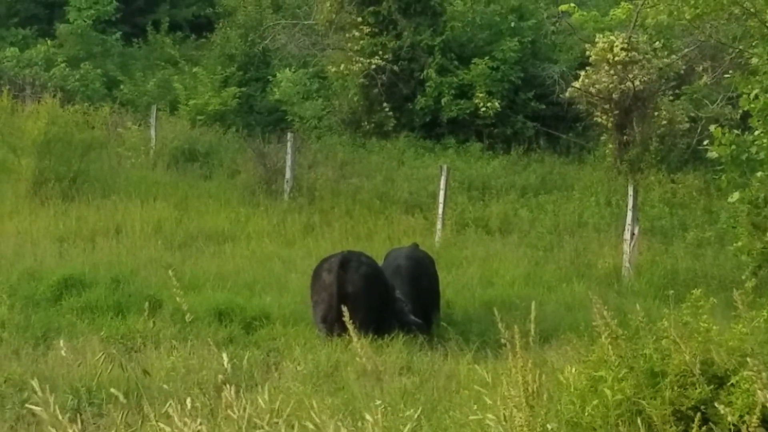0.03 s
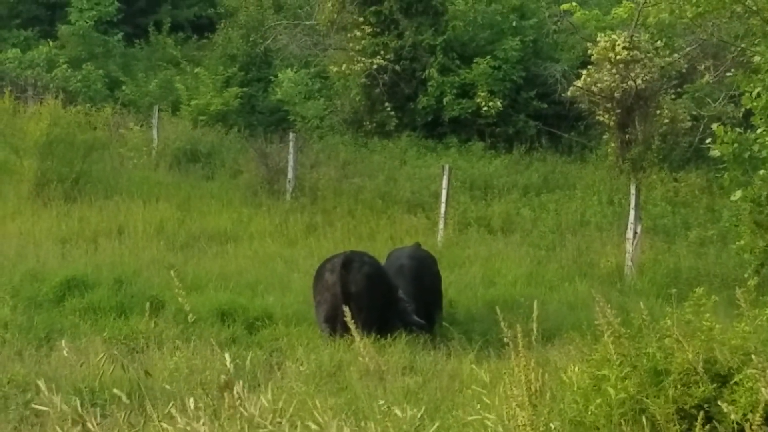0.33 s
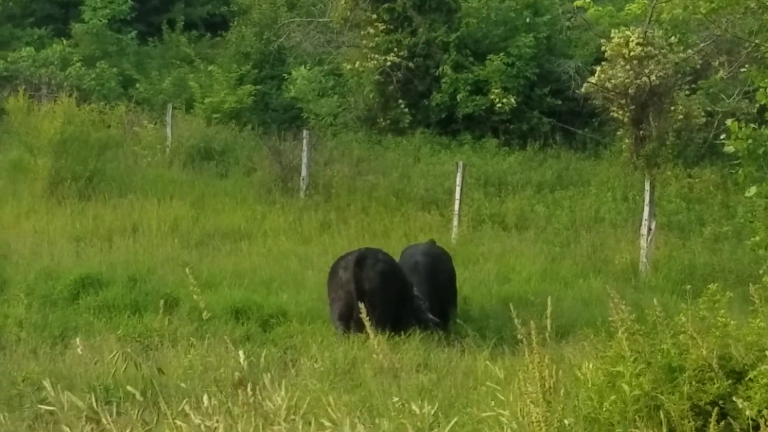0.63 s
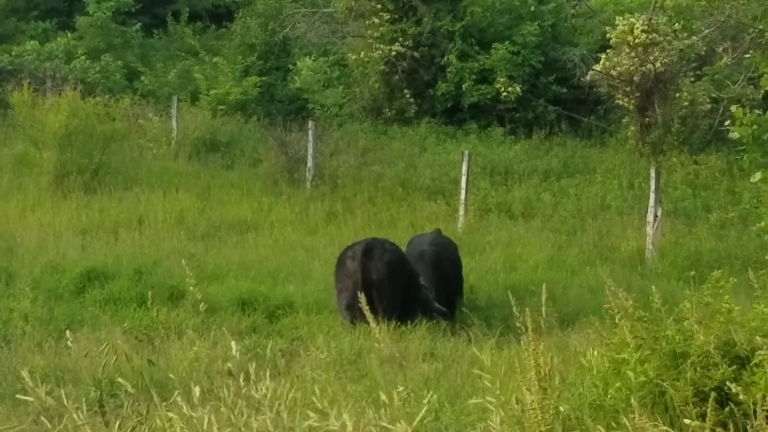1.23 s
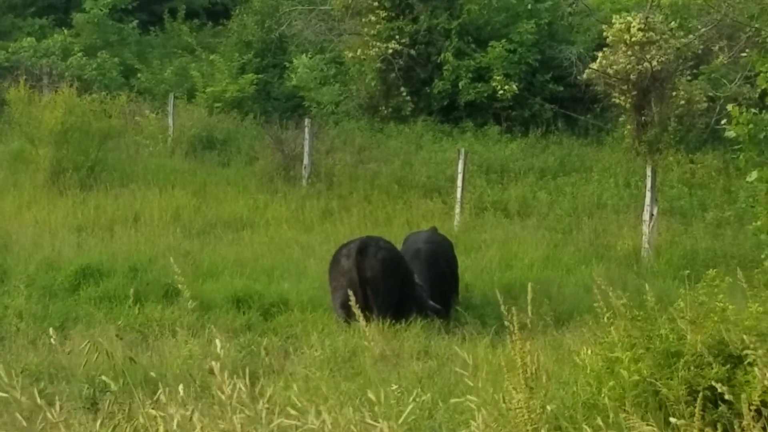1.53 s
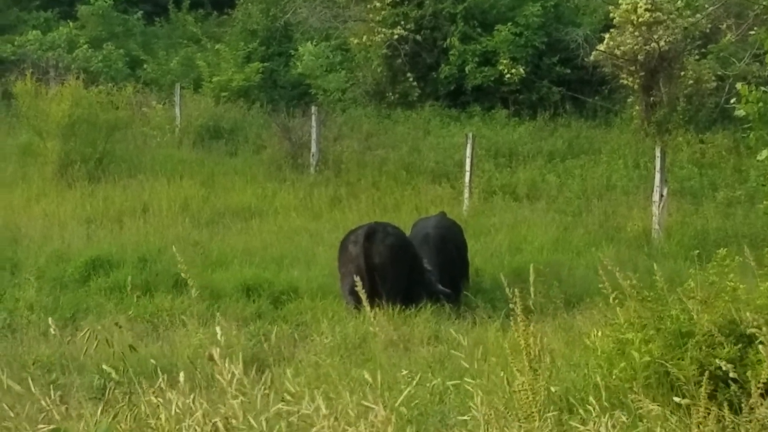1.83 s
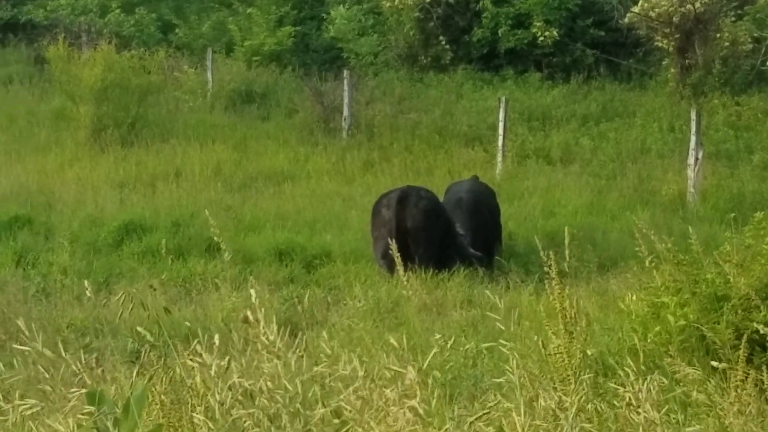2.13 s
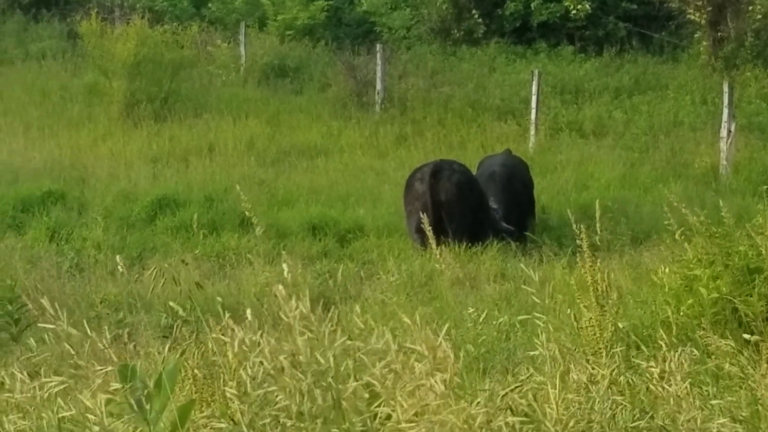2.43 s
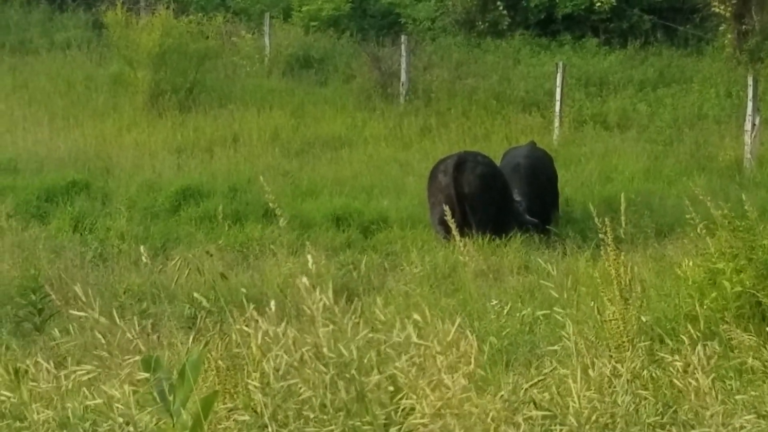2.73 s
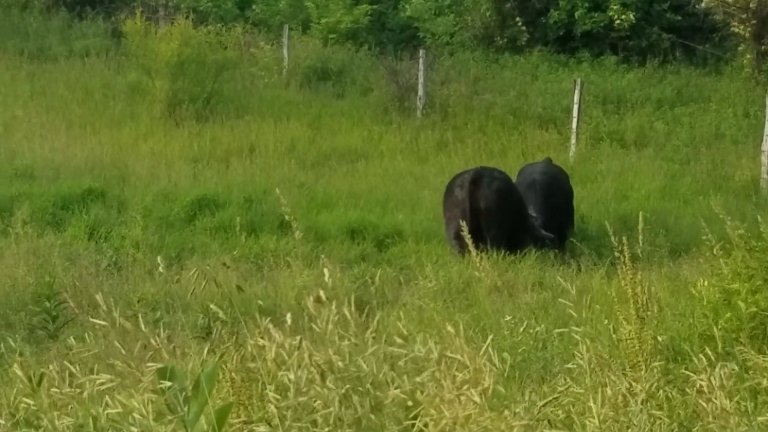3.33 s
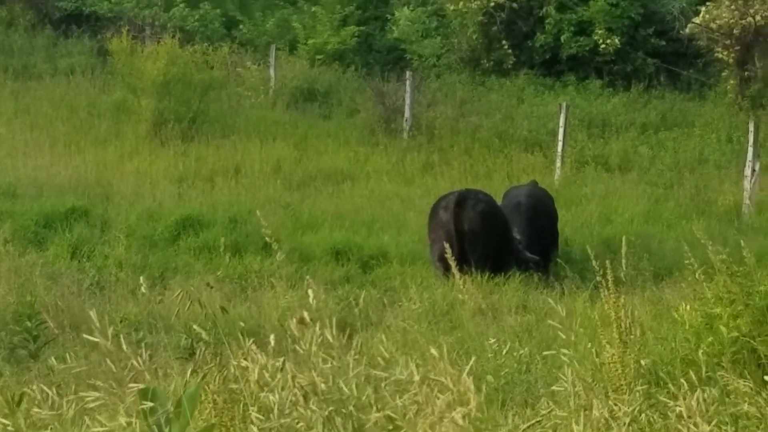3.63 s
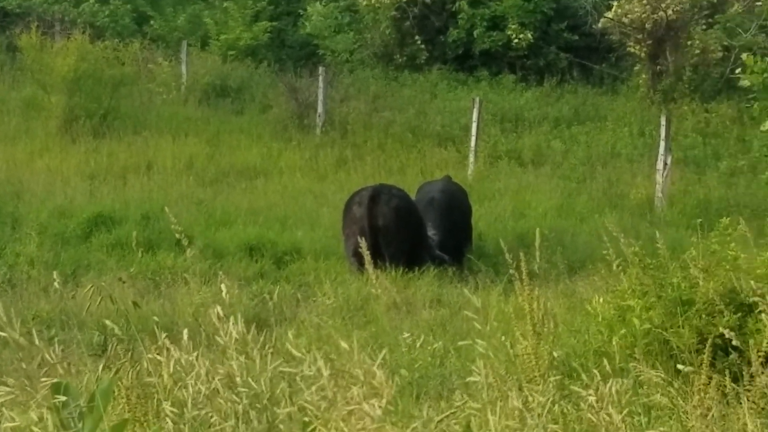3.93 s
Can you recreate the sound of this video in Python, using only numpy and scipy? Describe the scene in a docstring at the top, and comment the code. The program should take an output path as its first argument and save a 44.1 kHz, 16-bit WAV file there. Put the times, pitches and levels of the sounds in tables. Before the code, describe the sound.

An engine idles with a low throb, a mechanical whirr and uneven ticking on the left. Crickets trill faintly in the surrounding pasture, a bird chips briefly, and the tyre noise of a distant car slowly swells.

```python
"""Idling engine in a summer pasture.

The exhaust throbs low under a mechanical whirr, and a loose part ticks unevenly on the left.
Crickets trill with their wings, small birds chip twice and grass stalks brush faintly.
The tyre rush of a far car slowly swells."""
import sys
import numpy as np
from scipy import signal
from scipy.fft import rfft, irfft, next_fast_len
from scipy.io import wavfile
from scipy.ndimage import map_coordinates

SR = 44100
rng = np.random.default_rng(int(sys.argv[2]) if len(sys.argv) > 2 else 0)


def store_wav(level_fs):
    """Save 16-bit WAV to argv[1]."""
    pcm = np.round(np.clip(np.atleast_2d(level_fs), -1, 1) * 32767)
    wavfile.write(sys.argv[1], SR, pcm.T.astype(np.int16))


N = 176400


def amp(db):
    """Decibels to gain."""
    return 10 ** (np.asarray(db) / 20)


def unit(x):
    """Scale to rms 1."""
    return x / np.sqrt(np.mean(x ** 2) + 1e-20)


def along(points, hz):
    """Interpolate (frequency [Hz], value) points on a log axis."""
    freqs, values = np.transpose(points)
    return np.interp(np.log(hz + 1), np.log(freqs + 1), values)


def curve(rows):
    """Interpolate (time [s], value) points per sample."""
    return np.interp(np.arange(N) / SR, *np.transpose(rows))


def wobble(rate_hz):
    """Smooth random curve, rate_hz knots a second."""
    knots = rng.standard_normal(int(N * rate_hz / SR) + 4)
    return map_coordinates(knots, [np.arange(N) * rate_hz / SR])


def filtered(x, response):
    """Apply a frequency response."""
    size = next_fast_len(N + SR // 2)
    return irfft(rfft(x, size) * response(np.fft.rfftfreq(size, 1 / SR)), size)[..., :N]


def pan(db):
    """Constant-power stereo gains for an L-R difference."""
    gains = amp(np.array([[.5], [-.5]]) * db)
    return gains / np.sqrt(np.mean(gains ** 2, axis=0))


def rush(spectrum, coherence, balance=((1, 0),)):
    """Stereo noise, rms 1; density, L-R coherence and balance by frequency."""
    def mid_side_gains(hz):
        angle = np.arccos(np.clip(along(coherence, hz), -1, 1)) / 2
        return amp(along(spectrum, hz)) * [np.cos(angle), np.sin(angle)]
    mid, side = filtered(rng.standard_normal((2, N)), mid_side_gains)
    return unit(filtered(np.array([mid + side, mid - side]), lambda hz: pan(along(balance, hz))))


# engine speed (time [s], cycle rate [Hz])
ENGINE_SPEED = [(0.0, 19.74), (0.75, 19.71), (0.95, 20.08), (1.15, 20.51), (1.42, 20.49), (1.6, 19.79),
                (1.88, 20.53), (2.15, 20.19), (2.55, 19.96), (3.2, 19.93), (3.55, 19.67), (4.0, 20.09)]
FIRST_PULSE_S = .045


def engine_cycles():
    """Cycles turned since the first pulse; two firings per cycle."""
    cycles = np.cumsum(curve(ENGINE_SPEED)) / SR
    return cycles - cycles[int(FIRST_PULSE_S * SR)]


# exhaust boom, order 4 (time [s], level [dB])
BOOM_LEVEL = [(0, -28), (.85, -27), (1.1, -31.5), (1.45, -32), (1.56, -28.5), (1.7, -28.5), (1.93, -32),
              (2.06, -31), (2.3, -31), (2.6, -28.5), (3.1, -30), (3.5, -27.5), (4, -29.5)]
# other exhaust orders (multiple of cycle rate, level [dB])
EXHAUST_ORDERS = [(2, -37.5), (5, -46), (6, -40), (7, -35.5), (8, -43), (10, -57.5), (15, -57.5)]
# muffler chambers (centre [Hz], width [Hz])
MUFFLER_CHAMBERS = [(100, 3), (161, 5)]
# combustion rumble (frequency [Hz], relative density [dB])
RUMBLE_SPECTRUM = [(12, -19), (26, -16), (45, -5.5), (62, -7.5), (100, -3.5), (140, -1.5), (180, -7.5),
                   (250, -12.5), (335, -13.5), (400, -22), (450, -22.5), (900, -52.5)]


def exhaust(cycles):
    """Engine orders, delayed and smeared by the muffler, over the rumble of uneven combustion."""
    def order(k, waver_rad):
        hz = k * cycles[-1] / (N / SR - FIRST_PULSE_S)
        lag_rad = sum(2 * np.arctan2(hz * width, centre ** 2 - hz ** 2)
                      for centre, width in MUFFLER_CHAMBERS)
        return np.sqrt(2) * np.cos(2 * np.pi * k * cycles - lag_rad + waver_rad * wobble(14))
    boom_db = curve(BOOM_LEVEL)
    tone = amp(boom_db + .93 * wobble(9.9)) * order(4, waver_rad=.085)
    swell_db = boom_db - boom_db.mean()
    for k, db in EXHAUST_ORDERS:
        depth = k / 7  # higher orders waver more
        waver_db = depth * (1.4 * wobble(9) + .25 * swell_db)
        tone += amp(db + waver_db) * order(k, waver_rad=.17 * depth ** 2)
    rumble = amp(-39.5) * rush(RUMBLE_SPECTRUM, coherence=[(30, .6), (100, 1), (350, .83)])
    return tone * pan(db=1.56) + rumble


# mechanical rush (frequency [Hz], relative density [dB])
WHIRR_SPECTRUM = [(150, -6.5), (400, -1.5), (680, -0.5), (830, 1), (980, -6), (1230, 1.5), (1370, -3.5),
                  (1560, 2), (1800, -3), (2150, 0), (2600, -6), (3100, -6.5), (3500, -12), (4200, -15.5),
                  (6200, -18.5), (7500, -39.5), (10000, -29)]
# stereo likeness (frequency [Hz], L-R coherence)
WHIRR_COHERENCE = [(300, 1), (700, .6), (1300, -0.0006), (2300, 0.11), (6000, 0.4)]
# stereo position (frequency [Hz], L-R [dB])
WHIRR_BALANCE = [(300, 2), (700, 0.5), (1500, 9), (3000, 8.5), (6000, 7.5)]


def whirr(cycles):
    """The engine's mechanical rush pulses with the firings."""
    pulsing = 1 + .15 * np.cos(2 * np.pi * 2 * cycles)
    return amp(-43 + .63 * wobble(11)) * pulsing * rush(WHIRR_SPECTRUM, WHIRR_COHERENCE, WHIRR_BALANCE)


# hardest ticks (time [s], relative level [dB])
HARD_TICKS = [(0.0523, -38), (0.1266, -37), (0.2768, -40), (0.3311, -42), (0.404, -37), (0.5844, -42),
              (0.6599, -38), (0.7063, -41), (0.8844, -40), (0.9208, -41), (1.04, -42), (1.1134, -39),
              (1.4785, -38), (1.6272, -36), (1.6776, -35), (1.722, -41), (2.0687, -41), (2.1644, -40),
              (2.365, -39), (2.5381, -39), (2.7427, -38), (3.1443, -37), (3.5987, -36), (3.6451, -35),
              (3.8501, -37)]
# loose part's modes (frequency [Hz], relative level [dB], T60 [s])
PART_MODES = [(1510, -2, .034), (1690, 0, .034), (2200, -14, .02), (2700, -15, .02), (3080, -10, .028)]


def loose_part(cycles):
    """A loose part ticks softly once per firing, now and then hard, and rings briefly."""
    detune, scatter_db, rise_s = .02, 1.5, .003
    soft_times_s = np.flatnonzero(np.diff(np.floor(2 * cycles - .5))) / SR
    soft = [(s, -53 + 2.5 * np.clip(rng.normal(), -2, 2)) for s in soft_times_s]
    hard = [(s, db + 3.5) for s, db in HARD_TICKS]
    t = np.arange(SR // 10) / SR
    attack = 1 - np.exp(-t / rise_s)
    out = np.zeros((2, N + SR))
    for start_s, db in hard + soft:
        start = int(start_s * SR)
        for hz, mode_db, t60_s in PART_MODES:
            phase = 2 * np.pi * (hz * (1 + detune * rng.normal()) * t + rng.random((2, 1)))
            decay = amp(db + mode_db + rng.normal(0, scatter_db) - 60 * t / t60_s)
            out[:, start:start + len(t)] += 2 * attack * decay * np.sin(phase)
    return out[:, :N] * pan(db=10)


# car's approach (time [s], level [dB])
CAR_LEVEL = [(0, -58.5), (1.4, -51), (1.8, -51.5), (2, -44.5), (2.3, -44.5), (2.8, -42), (3.25, -38.5),
             (3.7, -37), (4, -39.5)]
# tyre noise (frequency [Hz], relative density [dB])
TYRE_SPECTRUM = [(100, -10.5), (230, -0.5), (400, -5), (600, -3.5), (920, 3.5), (1150, 1), (1500, -10.5),
                 (2200, -13.5), (3200, -19), (6000, -45)]
# stereo likeness (frequency [Hz], L-R coherence)
TYRE_COHERENCE = [(250, 0.93), (600, 0.64), (1200, -0.61), (2500, 1)]


def far_car():
    """Tyre noise swells as the car draws nearer."""
    level_db = curve(CAR_LEVEL) + .28 * wobble(5.77)
    return amp(level_db) * rush(TYRE_SPECTRUM, TYRE_COHERENCE, balance=[(300, 0), (900, 5)])


# near crickets (carrier [Hz], stroke rate [Hz], level [dB], L-R [dB])
NEAR_CRICKETS = [(4850, 66.8, -54.5, 23), (4670, 33.2, -55.5, 14), (4905, 49, -58.5, -9),
                 (5360, 37.8, -61.5, 13)]
# far crickets (frequency [Hz], relative density [dB])
CHORUS_SPECTRUM = [(3800, -34), (4350, -8.5), (4600, 4), (4830, 0), (5050, -1.5), (5450, -10.5),
                   (5650, -43), (7000, -58)]


def crickets():
    """Each wing stroke is a short sagging tone, blurred by grass; far crickets merge into a band."""
    sag_hz, blur_rad = 109, .59
    out = amp(-52 + .43 * wobble(5.9)) * rush(CHORUS_SPECTRUM, coherence=[(4800, .067)])
    for carrier_hz, rate_hz, db, pan_db in NEAR_CRICKETS:
        stroke = (np.cumsum(rate_hz * (1 + .0089 * wobble(3))) / SR + rng.random()) % 1
        drift_hz = 9.99 * np.array([wobble(60), wobble(60)])
        hz = carrier_hz + drift_hz - sag_hz * (2 * stroke - 1)
        phase = 2 * np.pi * np.cumsum(hz, axis=1) / SR
        phase += blur_rad * np.array([wobble(220), wobble(220)])
        tone = np.sin(phase) + amp(-24) * np.sin(2 * phase) + amp(-26) * np.sin(3 * phase)
        pulses = np.abs(np.sin(np.pi * stroke)) ** 2.08
        out += amp(db + .34 * wobble(8)) * unit(tone * pulses) * pan(pan_db)
    return out


# bird calls (start [s], length [s], initial pitch [Hz], target pitch [Hz], level [dB])
BIRD_CHIPS = [(1.806, .055, 5800, 7900, -59), (3.404, .02, 2800, 2400, -39.5)]


def birds():
    """Thin gliding chips, echoed by the trees."""
    bend_s, echo_t60_s = .028, .4
    chips = np.zeros(N)
    for start_s, length_s, from_hz, target_hz, db in BIRD_CHIPS:
        t = np.clip(np.arange(N) / SR - start_s, 0, length_s)
        hz = target_hz + (from_hz - target_hz) * np.exp(-t / bend_s)
        rough_rad = 1.1 * target_hz / 7900 * wobble(900)
        envelope = amp(db) * np.sin(np.pi * t / length_s)
        chips += envelope * np.sin(2 * np.pi * np.cumsum(hz) / SR + rough_rad)
    tail = rng.standard_normal((2, SR // 2)) * amp(-60 * np.arange(SR // 2) / SR / echo_t60_s)
    echo = signal.fftconvolve(chips[None], tail / np.linalg.norm(tail[0]), axes=1)[:, :N]
    return (chips + amp(-3) * echo) * pan(db=7)


# grass rustles (time [s], half length [s], centre [Hz], level [dB])
GRASS_RUSTLES = [(1.417, .02, 4000, -47.5), (2.498, .007, 13500, -53), (3.718, 0.0087, 12500, -53)]


def grass():
    """Stalks brush each other in brief, soft puffs of noise."""
    skirt_ratio = 3.24
    t = np.arange(N) / SR
    out = np.zeros((2, N))
    for peak_s, half_s, hz, db in GRASS_RUSTLES:
        spectrum = [(hz / skirt_ratio, -40), (hz, 0), (hz * skirt_ratio, -40)]
        envelope = amp(db) * np.exp(-((t - peak_s) / half_s) ** 2)
        out += envelope * rush(spectrum, coherence=[(4000, 0)])
    return out * pan(db=5)


# top of an insect trill (frequency [Hz], relative density [dB])
SIZZLE_SPECTRUM = [(8000, -39), (9500, -16), (9750, -8), (9950, -18), (12000, -24), (14250, -23),
                   (14600, -8), (14950, -8), (15700, -14)]
# trill's swell (time [s], level [dB])
SIZZLE_SWELL = [(0, -76), (1.2, -74), (1.6, -62), (4, -70)]


def insect_sizzle():
    """One insect's highest overtones pulse faintly on the left."""
    rate_hz = 33.5 * (1 + .006 * wobble(3))
    pulses = np.sin(np.pi * np.cumsum(rate_hz) / SR) ** 2
    level_db = curve(SIZZLE_SWELL) + 1.5 * wobble(9)
    return amp(level_db) * unit(pulses * rush(SIZZLE_SPECTRUM, coherence=[(9000, 0)])) * pan(db=10)


def scene():
    """Engine, road, insects, birds and grass together."""
    cycles = engine_cycles()
    engine = exhaust(cycles) + whirr(cycles) + loose_part(cycles)
    return engine + far_car() + crickets() + insect_sizzle() + birds() + grass()


# microphone hiss (frequency [Hz], relative density [dB])
HISS_SPECTRUM = [(3000, -9), (7000, 0), (8400, 1), (9100, -7), (10800, -0.5), (13200, -2.5), (15500, 1.5)]
# stereo position (frequency [Hz], L-R [dB])
HISS_BALANCE = [(7500, 0), (8400, 5), (9200, 9), (15000, 10)]


def record(dry):
    """The microphones add hiss; nothing passes above the band limit."""
    limit_hz = 15780
    hiss = amp(-55.5) * rush(HISS_SPECTRUM, coherence=[(8000, 0)], balance=HISS_BALANCE)
    return filtered(dry + hiss, lambda hz: hz < limit_hz)


dry = scene()
out = record(dry)
store_wav(out)
```